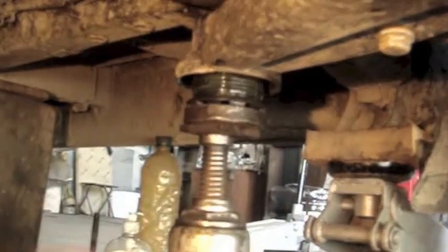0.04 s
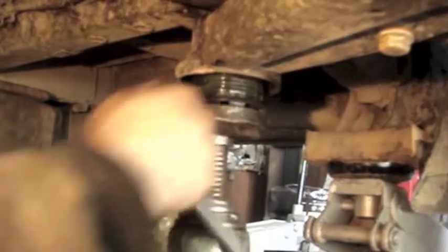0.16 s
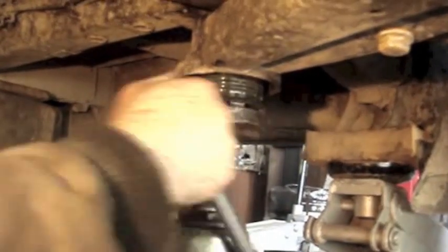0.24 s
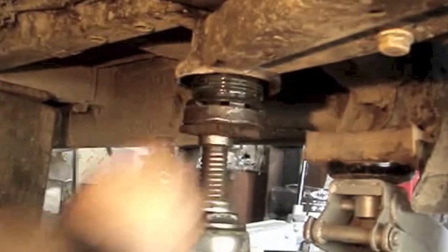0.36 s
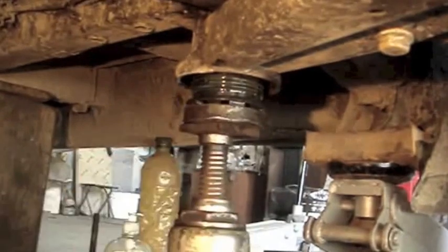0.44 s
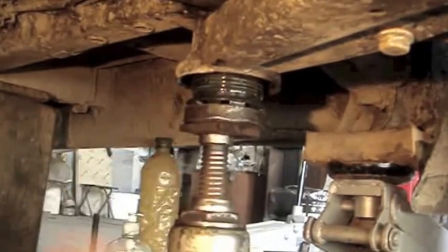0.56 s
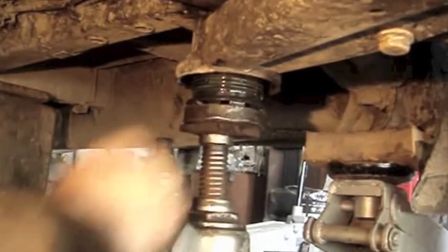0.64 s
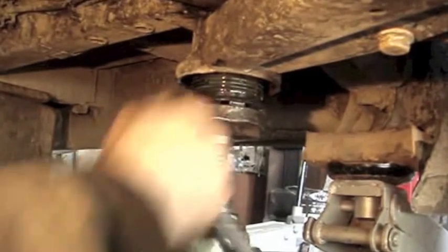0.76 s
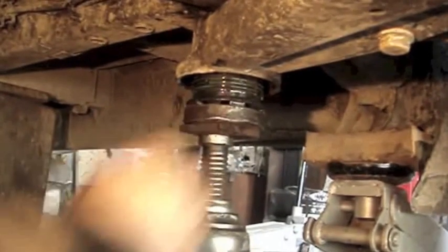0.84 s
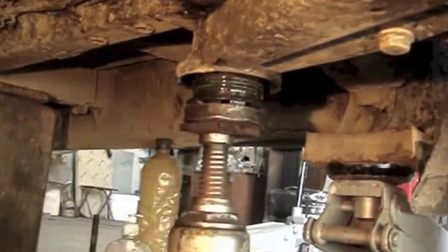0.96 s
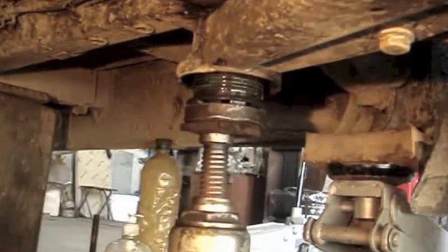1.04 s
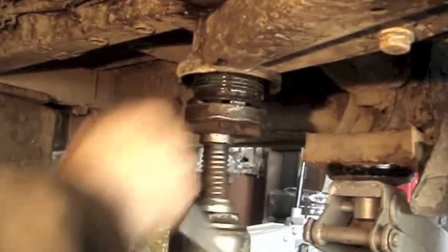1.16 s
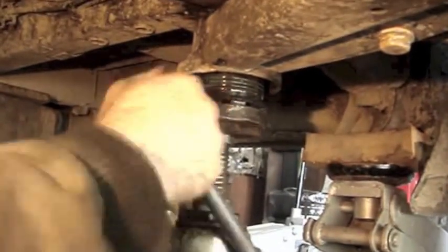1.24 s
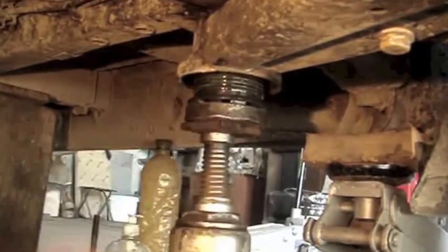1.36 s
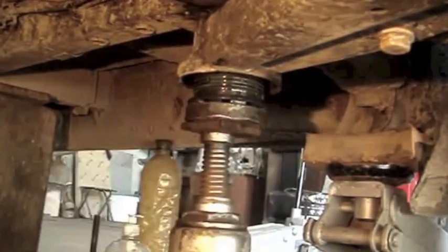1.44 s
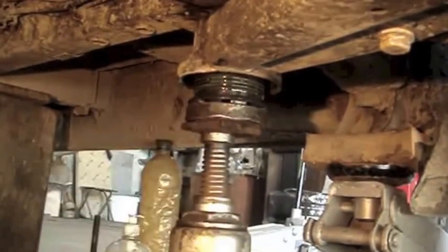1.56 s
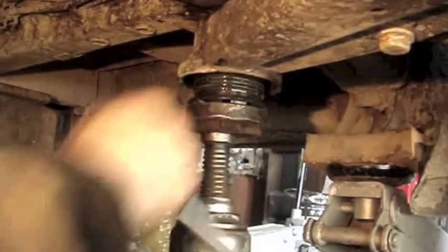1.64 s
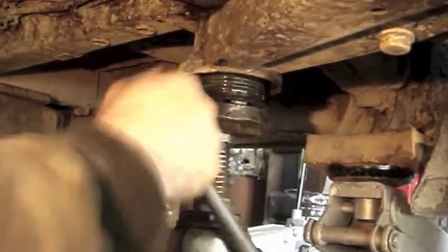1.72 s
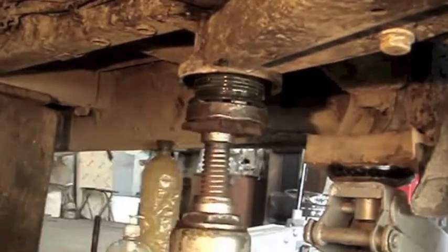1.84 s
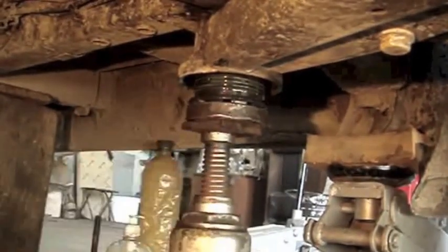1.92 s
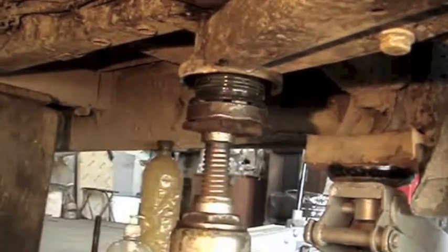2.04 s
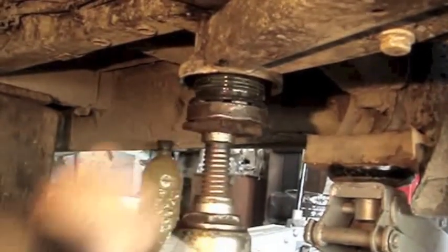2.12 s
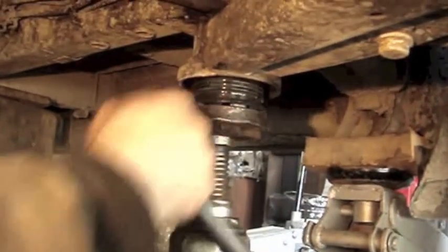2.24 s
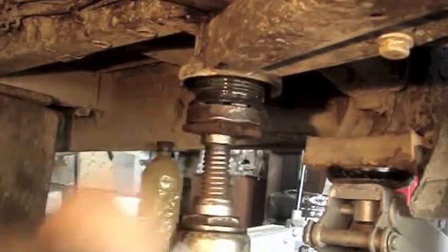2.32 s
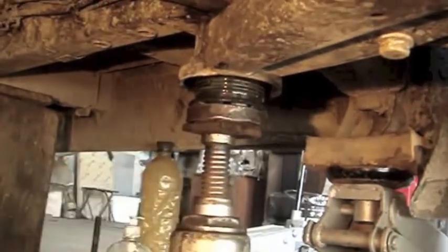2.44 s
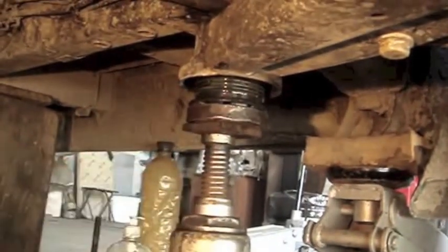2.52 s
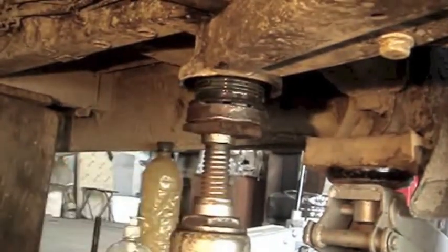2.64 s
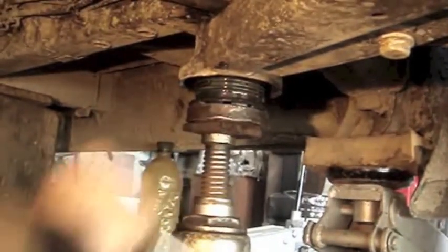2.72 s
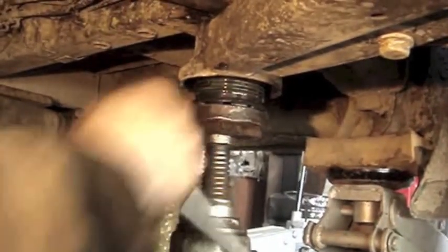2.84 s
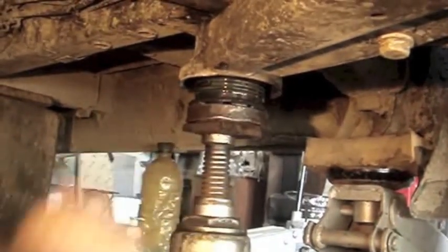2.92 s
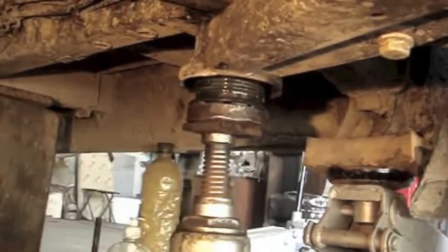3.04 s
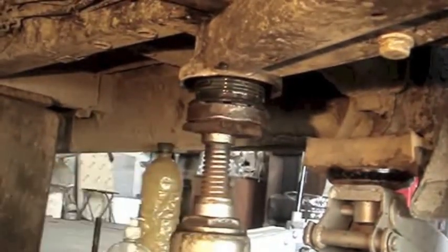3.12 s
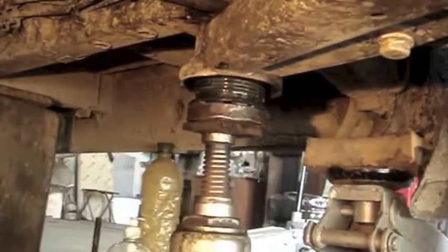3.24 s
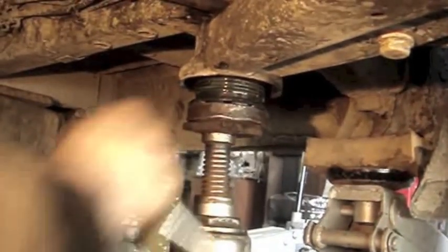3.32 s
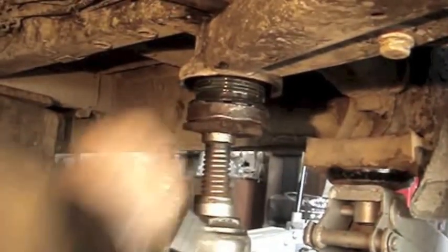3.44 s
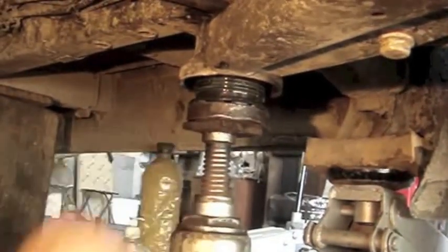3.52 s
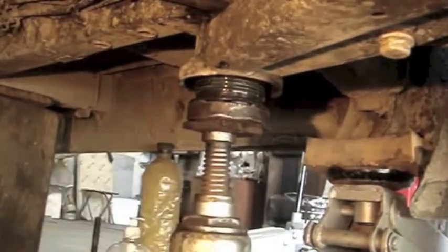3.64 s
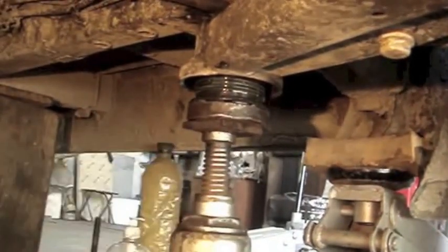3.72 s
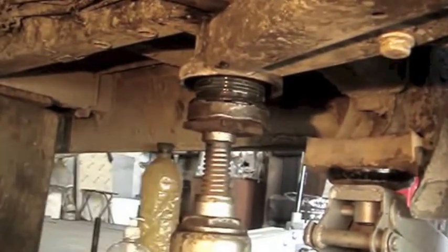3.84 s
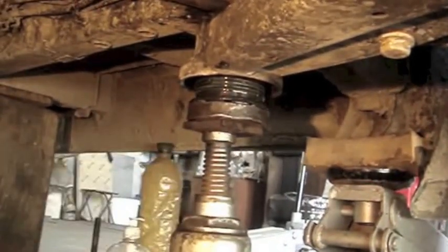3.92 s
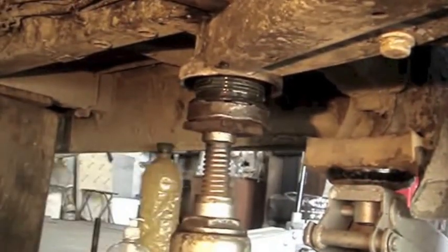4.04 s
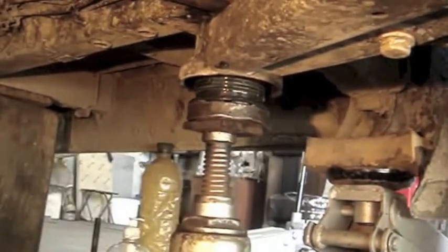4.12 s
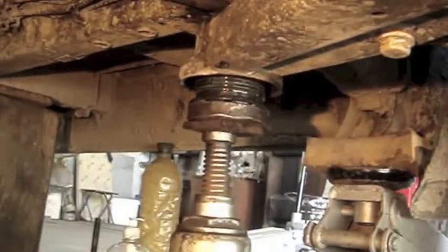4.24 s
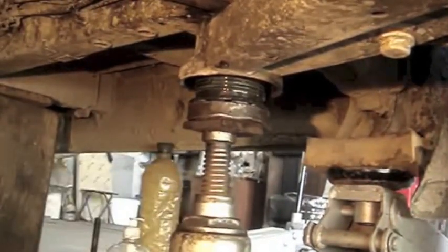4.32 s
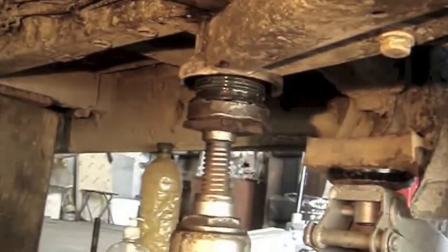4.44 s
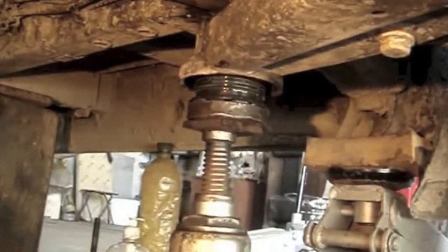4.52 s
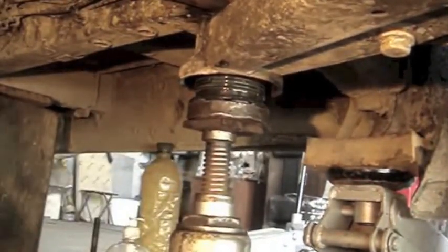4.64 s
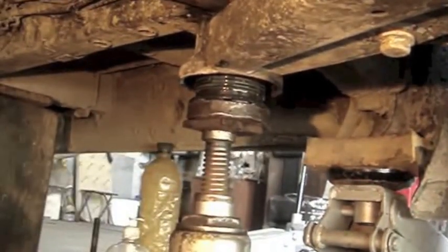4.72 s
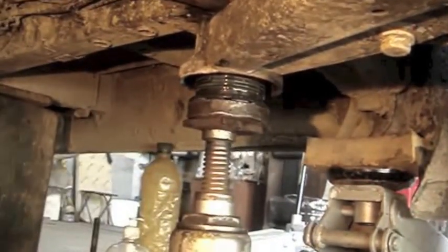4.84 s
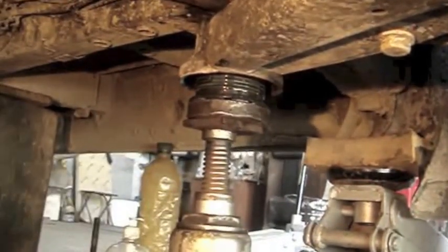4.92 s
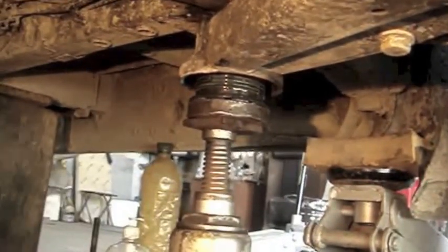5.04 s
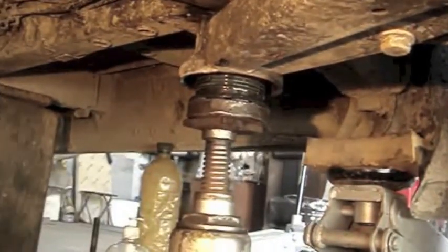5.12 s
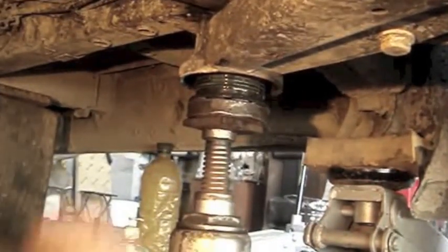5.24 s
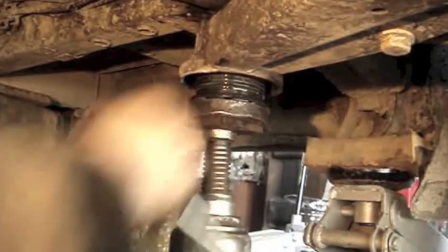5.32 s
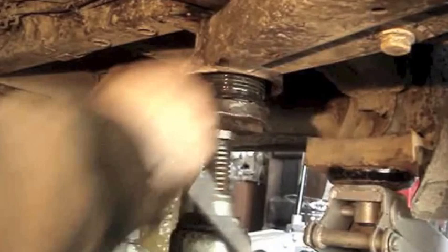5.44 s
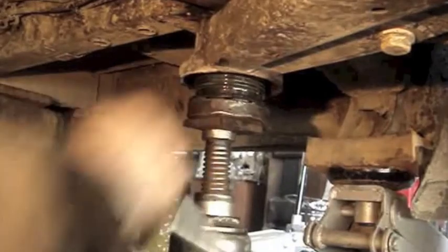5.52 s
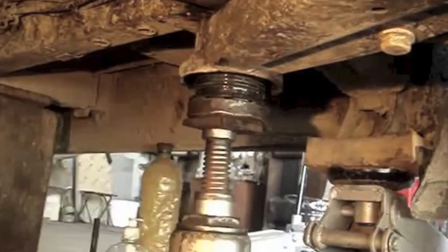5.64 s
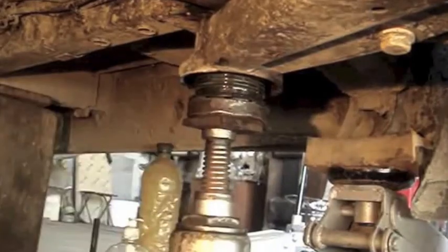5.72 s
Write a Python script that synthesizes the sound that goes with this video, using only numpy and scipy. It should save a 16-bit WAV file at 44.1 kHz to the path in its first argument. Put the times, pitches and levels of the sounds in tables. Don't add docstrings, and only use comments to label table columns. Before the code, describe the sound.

Close, bright metallic ratcheting: rattle, sharp pawl snaps, gritty socket grind and light knock, repeated quickly, then a quiet gap and a final burst.

```python
import sys
import numpy as np
from scipy import signal
from scipy.fft import rfft, irfft, next_fast_len
from scipy.io import wavfile
from scipy.ndimage import uniform_filter1d, map_coordinates

SR = 44100
rng = np.random.default_rng(int(sys.argv[2]) if len(sys.argv) > 2 else 0)


def store_pcm(level_fs):
    pcm = np.round(np.clip(level_fs, -1, 1) * 32767).astype(np.int16)
    wavfile.write(sys.argv[1], SR, np.atleast_2d(pcm).T)


def ratio(d):
    e = np.asarray(d, float) / 20
    return 10 ** e


N = 254888

# centre in Hz, width in Hz, level in dB.
PAWL_MODES = [(4338, 160, 1), (4466, 39, 6), (4692, 310, 1.5), (4933, 100, -2.5)]
# centre in Hz, width in Hz, level in dB.
HEAD_MODES = [(6107, 390, 6), (6456, 350, 7), (6850, 120, 1), (7630, 310, -10.5), (9370, 150, -5.5),
              (9300, 85, -12)]
# centre in Hz, width in Hz, level in dB.
SHANK_MODES = [(2300, 310, -9), (2550, 60, 0.5), (2890, 91, -6), (3170, 76, 2), (3700, 94, -10),
               (3880, 81, -14.5)]
# centre in Hz, width in Hz, level in dB.
SOCKET_MODES = [(329.6, 12, -12), (636, 61, -1), (798, 17, -6.5), (1116.4, 34, 2.5), (1198, 79, -5),
                (1470, 50, 3.5), (1620, 58, -2), (1908, 220, -3)]
# centre in Hz, width in Hz, level in dB.
HANDLE_MODES = [(1145, 12, -17), (4670, 9, -4), (4742, 7, 0), (6140, 14, -11)]
# centre in Hz, width in Hz, level in dB.
CRACK_MODES = [(1500, 900, 0), (7000, 3000, -4)]

# start in seconds, peak in dB, heft in dB, decay time t60 in seconds, extra pawl ring in dB.
SNAPS = [(.787, -19.5, 3, .03, -7), (.8064, -7, -5.5, 0.051, -8), (.8316, -14.5, -4, 0.034, 3),
         (.8483, -27, -3.5, 0.022, -3.5), (1.3261, -11, 2.5, .03, 0.9), (1.3521, -9, -5, 0.027, -1.5),
         (1.3654, -44, 6, 0.049, 16), (1.4072, -30, 12, 0.042, -1.5), (1.7828, -14.5, -4, .029, 8),
         (1.8082, -14, -2, .037, 0.5), (2.2714, -30, 8.5, 0.017, -3), (2.2902, -13.5, 4.5, .033, -1.5),
         (2.3175, -16, -1, 0.054, 2.5), (2.3316, -32, 3, 0.012, 8), (2.355, -46, 6, .031, 7.5),
         (2.8884, -14, 7.5, 0.018, 0.5), (2.9074, -12, 2.5, 0.026, -0.2), (2.93, -28, -15, .064, -9),
         (3.4563, -14.5, 9, 0.026, -3), (3.478, -8, -2, 0.024, -3.5), (3.505, -35, -1, .045, -25),
         (3.5234, -37, 1, 0.14, -1.5), (5.4791, -17, 10, 0.057, 7)]
# start in seconds, peak in dB, heft in dB, t60 in seconds, extra pawl ring in dB if any.
RATTLES = [(.1467, -14.5, 3, 0.04, 0), (.1885, -27, 10, 0.06, 8), (.2344, -33, 7, 0.057),
           (.6677, -17, 0, 0.034, 3), (.6724, -15, -5, 0.057), (.6975, -20.5, 6, 0.062, 4),
           (1.1682, -26, 1, 0.075), (1.1927, -18.5, 1, 0.021), (1.2004, -17.5, 1, 0.045),
           (1.6362, -17, -8, 0.028, 5), (1.6528, -13, -1, .026, -11), (1.6801, -18, 4, 0.064, -5),
           (2.1442, -21, 3.5, 0.061), (2.157, -15, -3, 0.017), (2.1732, -25, 10, .024),
           (2.1864, -17.5, 7, 0.047), (2.7524, -16, 0, 0.022, 4), (2.7664, -14, -1, .037, -7),
           (3.3337, -25, 12, .036, 6), (3.3419, -12.5, -3.5, 0.039), (3.3668, -22, 5.5, 0.034),
           (3.9534, -54, -6, 0.053), (5.3102, -12.5, 8, .043, 2), (5.3328, -11, -14, .094, -8),
           (5.3504, -21.5, 12, 0.11), (5.459, -21.5, -8, .038), (5.5154, -23, 8, .024, 3)]
# start in seconds, peak in dB, heft in dB, t60 in seconds, extra pawl ring in dB if any.
GRINDS = [(.3785, -11.5, -26, .1), (.4167, -11.5, -6, .075, -1), (.4283, -18, 6, 0.17),
          (.4448, -16.5, 4.5, 0.074), (.9179, -14, -3, 0.055, 5), (.9317, -22, 14.5, 0.1),
          (.9414, -13, -13, 0.047), (1.4221, -15, -5, 0.082, -5), (1.4406, -14, 1, 0.069),
          (1.4509, -21, 4, 0.081, -4), (1.8774, -17, -3, .065, -9), (1.8844, -15.5, -11, 0.096),
          (1.8965, -11, 0, 0.047), (1.9067, -15, 3, 0.085), (2.4014, -14, -9, 0.023),
          (2.406, -12.5, -5, 0.05), (2.4231, -16, 9, .048, -10), (2.4325, -23, 16, 0.048),
          (2.9766, -17, -2, 0.048), (2.9819, -15, -3, .1, 5), (2.9954, -20, 14, .066, 13),
          (3.5585, -16, -5, 0.089, 2), (3.5652, -20.5, 4.5, 0.074), (3.5715, -13.5, 8, 0.041, 4),
          (5.5741, -12, -8, .069, -14), (5.5891, -16, 13, .12, 7), (5.6143, -17, 16, .038, 10),
          (5.6264, -25, 14, .03, 4)]
# start in seconds, peak in dB, heft in dB, t60 in seconds, extra pawl ring in dB if any.
KNOCKS = [(.5367, -18, -5.5, 0.03), (1.038, -24.5, 4, 0.058, 4), (1.2294, -46, 2, 0.087),
          (1.5422, -27, 1.5, 0.049, 6), (2.003, -27.5, 0.5, 0.03), (2.5436, -26.5, 1, 0.041, 5),
          (2.8207, -41, 9, 0.016), (2.9514, -46, -9, 0.03), (3.0939, -46.5, 3.5, 0.074),
          (3.1221, -27.5, 2.5, 0.046), (3.394, -38, 2.5, 0.039), (3.611, -36.5, 0.5, 0.039),
          (3.7167, -31.5, 4.5, 0.04), (4.3899, -59, -2, 0.035), (4.553, -46, 8, 0.03, 3),
          (4.7248, -60, 16, .026, -15), (4.7846, -58, 6, .053), (5.7775, -22.5, 2, 0.022)]
# contacts, levels of pawl, shank and socket in dB,
# share of the heft that each of the three takes.
CONTACT_KINDS = [(SNAPS, (1.3, -14, -20), (.01, 1, 1)),
                 (RATTLES, (-2.1, 1.8, -12.5), (.01, .05, 0.98)),
                 (GRINDS, (-1.5, -1.7, -7.5), (.01, 0.16, 0.76)),
                 (KNOCKS, (1.3, 4.4, 8), (.2, 0.65, 1))]

# start in seconds, pitch in Hz, level in dB, t60 in seconds.
HEAD_RINGS = [(0.3798, 6120.0, -22.0, 0.04), (0.3799, 8930.0, -22.0, 0.04), (0.4189, 4670.0, -18.0, 0.245),
              (0.4283, 4540.0, -20.0, 0.093), (0.4336, 6130.0, -21.0, 0.04), (0.4469, 6360.0, -19.0, 0.04),
              (0.7012, 6230.0, -23.0, 0.04), (0.8064, 4430.0, -17.0, 0.041), (0.8064, 6140.0, -15.0, 0.04),
              (0.8342, 4460.0, -14.0, 0.146), (0.8338, 4760.0, -11.0, 0.183), (0.9226, 6880.0, -22.0, 0.04),
              (1.1927, 4680.0, -16.0, 0.04), (1.1927, 6660.0, -23.0, 0.04), (1.2004, 4220.0, -16.0, 0.04),
              (1.3261, 4500.0, -11.0, 0.04), (1.3262, 6120.0, -20.0, 0.057), (1.3521, 4360.0, -17.0, 0.047),
              (1.3521, 4730.0, -12.0, 0.054), (1.4237, 6640.0, -22.0, 0.04), (1.4406, 4650.0, -15.0, 0.05),
              (1.4437, 6120.0, -18.0, 0.04), (1.6362, 4720.0, -19.0, 0.04), (1.68, 6230.0, -23.0, 0.045),
              (1.7828, 4680.0, -10.0, 0.04), (1.8082, 4360.0, -17.0, 0.108), (1.8082, 4790.0, -13.0, 0.041),
              (1.9017, 6080.0, -19.0, 0.048), (2.1442, 4710.0, -22.0, 0.04), (2.2912, 4500.0, -15.0, 0.045),
              (2.2902, 6100.0, -24.0, 0.04), (2.3183, 4380.0, -15.0, 0.04), (2.3185, 4750.0, -12.0, 0.04),
              (2.4057, 4440.0, -15.0, 0.107), (2.4056, 4720.0, -12.0, 0.056),
              (2.8884, 4680.0, -13.0, 0.058), (2.9079, 4370.0, -18.0, 0.082), (2.9074, 4740.0, -10.0, 0.25),
              (2.9874, 4740.0, -16.0, 0.041), (2.9954, 4380.0, -17.0, 0.04), (3.343, 4200.0, -18.0, 0.066),
              (3.4572, 4710.0, -12.0, 0.04), (3.478, 4730.0, -10.0, 0.066), (3.5627, 4710.0, -18.0, 0.25),
              (3.5645, 6120.0, -19.0, 0.063), (5.4801, 4610.0, -13.0, 0.089),
              (5.5154, 4480.0, -24.0, 0.044), (5.5891, 4720.0, -17.0, 0.077),
              (5.5985, 6590.0, -22.0, 0.107), (5.6135, 4680.0, -12.0, 0.096)]
# start in seconds, pitch in Hz, level in dB,
# t60 in seconds.
SHANK_RINGS = [(0.1488, 2400.0, -19.0, 0.156), (0.3887, 3170.0, -32.0, 0.04), (0.4195, 3650.0, -19.0, 0.04),
               (0.4336, 1670.0, -26.0, 0.075), (0.437, 2560.0, -26.0, 0.04), (0.4448, 3180.0, -19.0, 0.159),
               (0.5379, 1110.0, -23.0, 0.077), (0.5415, 1870.0, -26.0, 0.054),
               (0.6721, 3190.0, -18.0, 0.06), (0.9188, 3130.0, -19.0, 0.05), (0.9509, 1410.0, -27.0, 0.089),
               (0.9414, 3160.0, -18.0, 0.12), (1.0388, 1120.0, -23.0, 0.065),
               (1.0386, 2400.0, -24.0, 0.062), (1.2012, 2400.0, -16.0, 0.056),
               (1.2004, 2670.0, -20.0, 0.04), (1.4221, 3130.0, -21.0, 0.073),
               (1.4475, 2570.0, -26.0, 0.091), (1.6827, 3190.0, -18.0, 0.055),
               (1.8849, 3080.0, -22.0, 0.04), (1.8842, 3740.0, -22.0, 0.086),
               (1.9028, 1410.0, -24.0, 0.162), (2.157, 1150.0, -31.0, 0.153), (2.1878, 3240.0, -18.0, 0.04),
               (2.4347, 1440.0, -22.0, 0.04), (2.5458, 1490.0, -25.0, 0.103), (2.7672, 2550.0, -21.0, 0.1),
               (2.9074, 3220.0, -29.0, 0.072), (2.9836, 3140.0, -20.0, 0.214),
               (3.007, 1490.0, -22.0, 0.166), (2.9994, 3050.0, -21.0, 0.086),
               (3.1273, 1130.0, -24.0, 0.057), (3.3446, 2450.0, -19.0, 0.073),
               (3.478, 1220.0, -34.0, 0.078), (3.5675, 3120.0, -21.0, 0.1), (3.577, 1470.0, -20.0, 0.122),
               (3.5715, 2570.0, -18.0, 0.047), (3.72, 1150.0, -26.0, 0.053), (5.3343, 2550.0, -19.0, 0.156),
               (5.3487, 650.0, -23.0, 0.218), (5.3497, 2440.0, -23.0, 0.123),
               (5.5163, 2140.0, -30.0, 0.093), (5.5754, 2300.0, -22.0, 0.04),
               (5.5741, 3150.0, -21.0, 0.188), (5.5903, 670.0, -23.0, 0.2), (5.6073, 2890.0, -19.0, 0.1),
               (5.6298, 1140.0, -25.0, 0.04), (5.6223, 1500.0, -20.0, 0.25)]

# frequency in Hz, density in dB per Hz.
AIR_SPECTRUM = [(120, -40.5), (200, -11.5), (481, -3), (1240, -10), (5230, -22), (9990, -42), (10500, -58),
                (22000, -120)]
# frequency in Hz, density in dB per Hz.
DRONE_SPECTRUM = [(12, -30.5), (26, 1.5), (49, -10.5), (87, -14.5), (179, 2.5), (260, -11), (400, -13.5),
                  (880, -120)]
# centre in Hz, width in Hz, level in dB against the hum.
MACHINE_TONES = [(151, 11, -10), (187.6, 1.9, -5.5), (309.5, 5.3, -6)]
# time in seconds, half length in seconds, centre in Hz,
# width in Hz, level in dB.
RUSTLES = [(4.22, 0.11, 1650, 110, -60), (4.22, 0.1, 3350, 300, -61), (.25, .3, 5500, 2500, -49),
           (5.43, .05, 4900, 3000, -40), (5.366, 0.039, 480, 300, -33), (5.635, 0.03, 350, 250, -33.5),
           (4.88, 0.26, 50.3, 13, -54), (4.735, .014, 500, 200, -44), (4.558, .012, 620, 120, -45),
           (4.575, .018, 250, 80, -47), (4.66, .09, 720, 30, -56), (4.84, .1, 290, 12, -54),
           (4.68, .14, 1650, 70, -55), (5.11, .015, 160, 40, -47), (5.52, .016, 470, 35, -38),
           (5.746, .012, 580, 120, -40), (5.38, .04, 310, 30, -37), (.444, .008, 600, 250, -26)]
# time in seconds, half length in seconds, level in dB.
SURGES = [
    (.22, .1, -46),
    (.6, .08, -54),
    (1.1, .1, -57),
    (1.5, .1, -57),
    (2.55, .1, -56),
]
# time in seconds, room level in dB.
ROOM_GAIN = [(0, -43), (.3, -43), (.8, -55.5), (1.6, -57.5), (3.3, -56), (3.9, -60), (4.2, -56), (4.5, -52),
             (4.7, -48.5), (4.95, -49.5), (5.25, -48.5), (5.45, -43), (5.78, -44)]
# time in seconds, size.
JERKS = [(0.15, -.01), (0.381, 0.037), (0.417, -.018), (0.442, -.042), (0.674, -0.011), (0.835, -0.044),
         (0.942, -.035), (1.351, -0.045), (1.424, -.025), (1.441, -0.02), (1.783, -0.015), (1.808, -0.021),
         (1.899, -.018), (2.32, -0.049), (2.406, -0.014), (2.764, -0.014), (2.907, -0.052),
         (2.984, -0.0087), (3.345, -0.013), (3.477, -.04), (5.332, -.047), (5.48, -0.043), (5.61, -0.043)]
# frequency in Hz, t60 in seconds.
WALLS = [(300, 0.62), (1500, 0.43), (4700, 0.27), (10000, 0.16)]
# start in seconds, length in seconds, lower edge in Hz, depth in dB.
TREBLE_GAPS = [(0.123, .018, 2300, -36), (0.204, 0.021, 7000, -21), (0.401, .012, 4300, -51),
               (.517, .016, 3600, -20), (.766, .018, 5000, -22), (1.525, .012, 3500, -25),
               (0.72, 0.013, 4000, -26), (1.022, .01, 2500, -22), (.816, .016, 4000, -57),
               (.858, .014, 5860, -12), (2.965, .008, 900, -35), (1.17, 0.018, 2560, -41),
               (1.309, 0.012, 2510, -35), (1.335, 0.014, 6130, -38.5), (1.463, 0.021, 4830, -24),
               (1.663, 0.014, 4300, -46.5), (1.796, 0.0092, 3260, -51), (1.827, .044, 5000, -35),
               (2.009, .02, 7000, -23), (2.303, .015, 4900, -25), (2.334, .019, 3700, -46),
               (2.553, 0.016, 4500, -37.5), (2.86, .024, 2800, -36.5), (3.009, 0.028, 4450, -19),
               (3.109, .011, 990, -28), (3.435, .018, 3000, -38), (3.54, 0.015, 1200, -40),
               (3.588, 0.032, 4950, -20), (3.693, 0.018, 3000, -22), (3.732, .023, 5370, -39),
               (5.314, .016, 4000, -33.5), (5.454, .024, 3800, -30), (5.554, 0.017, 1830, -35)]

# level in dB at a room level of -55 dB, share of the gain's swing.
HUM, HISS, THROB = (-60.5, .9), (-63, 0.53), (-64, .6)
BLOW_DELAY_S = .0008
FIRST_BLOW, FIRST_S = 0.93, 0.00056
CRACK_DB = 4.5
RING_DB, RING_RISE_S = -2.5, .0012
GRIP_T60_S = .075
RING_BLUR_HZ, RING_FLUTTER_DB = 70, 3


def unit(x):
    return x / np.sqrt(np.mean(x ** 2) + 1e-20)


def along(points, hz):
    f, v = np.transpose(points)
    return np.interp(np.log(hz + 1), np.log(f + 1), v)


def filtered(x, response):
    m = next_fast_len(N + SR // 2)
    return irfft(rfft(x, m) * response(np.fft.rfftfreq(m, 1 / SR)), m)[:N]


def resonant(modes, broad_db):
    low, high = modes[0][0], modes[-1][0]
    middle = np.sqrt(low * high)

    def resonance(f, centre, width):
        return 1j * f * width / (centre * centre - f * f + 1j * f * width)

    def response(f):
        total = ratio(broad_db) * resonance(f, middle, high - low)
        for k, (centre, width, db) in enumerate(modes):
            total = total + (-1) ** k * ratio(db) * resonance(f, centre, width)
        total = total * resonance(f, middle, high)
        return total / np.sqrt(np.mean(np.abs(total) ** 2))

    return response


def wobble(rate):
    knots = rng.standard_normal(int(N * rate / SR) + 4)
    return map_coordinates(knots, [np.arange(N) * rate / SR])


def narrow(hz, width_hz):
    return unit(filtered(rng.standard_normal(N), lambda f: 1 / (1 + ((f - hz) / width_hz) ** 2)))


def steady(hz, drift_hz):
    return np.sqrt(2) * np.sin(2 * np.pi * np.cumsum(hz + drift_hz * wobble(6)) / SR)


def room():
    t = np.arange(N) / SR
    room_db = np.interp(t, *np.transpose(ROOM_GAIN))
    hum_gain, hiss_gain, throb_gain = [ratio(db + share * (room_db + 55)) for db, share in (HUM, HISS, THROB)]

    def swell(at, half, db):
        return ratio(db) * np.exp(-((t - at) / half) ** 2)

    def shaped(spectrum):
        return unit(filtered(rng.standard_normal(N), lambda hz: ratio(along(spectrum, hz))))

    air = shaped(AIR_SPECTRUM) * ratio(1.5 * wobble(9.1))
    drone = shaped(DRONE_SPECTRUM) * ratio(3.0 * wobble(7.7))
    tones = sum(ratio(db + 2.5 * wobble(4)) * narrow(hz, width) for hz, width, db in MACHINE_TONES)
    whine = ratio(-9) * np.clip(2 * t - 7.7, .3, 1) * steady(7570, 3)
    hiss = narrow(5000, 4000) + whine
    rustle = sum(swell(at, half, db) * narrow(hz, width) for at, half, hz, width, db in RUSTLES)
    surges = sum(swell(*row) for row in SURGES) * steady(97, 6) * ratio(2.5 * wobble(22))
    throb = throb_gain * narrow(97, 14) + surges
    return ratio(room_db) * air + hum_gain * (drone + tones) + hiss_gain * hiss + rustle + throb


def contacts():
    for rows, colour_db, share in CONTACT_KINDS:
        for s, db, heft_db, t60, *ring_db in rows:
            parts_db = np.array(colour_db) + heft_db * np.array(share) + [sum(ring_db), 0, 0]
            yield s + BLOW_DELAY_S, db, *parts_db, t60


def wrench():
    lead_in = SR // 100
    t = np.arange(-lead_in, SR // 8) / SR
    after = np.maximum(t, 0)
    force, chirps = np.zeros((6, N + SR)), np.zeros(N + SR)
    seat = np.exp(-(after / 0.0037) ** 4)
    lead = ratio(-15) * np.exp(np.minimum(t, 0) / .0016)
    for s, db, pawl_db, shank_db, socket_db, t60 in contacts():
        lives = np.clip(t60, .008, .2) * np.array([[1.01], [.8], [1.2], [1.6]])
        decay = ratio(-60 * after / lives) + 0.15 * seat + FIRST_BLOW * np.exp(-after / FIRST_S)
        shape = np.where(t < 0, lead, decay)
        clumps = ratio(4 * rng.standard_normal((4, len(t) // 50 + 1)).repeat(50, axis=1)[:, :len(t)])
        burst = rng.standard_normal((4, len(t))) * clumps * shape
        burst *= np.sqrt(np.sum(shape ** 2, axis=1) / np.sum(burst ** 2, axis=1))[:, None]
        at = round(s * SR) - lead_in
        levels_db = db + np.array([[-7.5], [pawl_db - 4], [shank_db - 4], [socket_db - 6]])
        force[:4, at:][:, :len(t)] += ratio(levels_db) * burst

        clean = np.clip((pawl_db - max(shank_db, socket_db) - 3.5) / 8, 0, 1)
        force[4, at:][:len(t)] += clean * ratio(db + pawl_db - 15) * burst[1]
        buzz = 0
        for hz, (detune, phase) in zip((4640, 4760), rng.standard_normal((2, 2))):
            buzz = buzz + np.sin(2 * np.pi * (hz * (1 + 0.008 * detune) * t + phase))
        buzz = buzz * np.where(t < 0, lead, seat)
        chirps[at:][:len(t)] += (0.084 + clean) * ratio(db + pawl_db - 5) * buzz

        crack_db = db + max(pawl_db, shank_db, socket_db) / 2 + CRACK_DB
        force[5, round(s * SR)] += ratio(crack_db) * np.sign(burst[0, -1])
    parts = [resonant(HEAD_MODES, -3), resonant(PAWL_MODES, -8), resonant(SHANK_MODES, -4),
             resonant(SOCKET_MODES, -9), resonant(HANDLE_MODES, -40), resonant(CRACK_MODES, 6)]
    return sum(filtered(f[:N], part) for f, part in zip(force, parts)) + chirps[:N]


def rings():
    out, t = np.zeros(N + SR), np.arange(SR // 10) / SR
    for s, hz, db, t60 in list(HEAD_RINGS) + list(SHANK_RINGS):
        walk, flutter = rng.standard_normal((2, len(t)))
        phase = 2 * np.pi * hz * t + np.sqrt(2 * np.pi * RING_BLUR_HZ / SR) * np.cumsum(walk)
        flutter_db = RING_FLUTTER_DB * unit(uniform_filter1d(flutter, size=90))
        level_db = db + RING_DB - 60 * t / min(t60, GRIP_T60_S) + flutter_db
        rise = 1 - np.exp(-t / RING_RISE_S)
        out[round(s * SR):][:len(t)] += ratio(level_db) * rise * np.sin(phase)
    return out[:N]


def jerks():
    steps, t = np.zeros(N), np.arange(SR // 10) / SR
    for s, size in JERKS:
        steps[round(s * SR)] = size
    return signal.fftconvolve(steps, np.exp(-t / .008) * (1 - np.exp(-t / 0.002)))[:N]


def walls(x):
    out, step = np.zeros(N + SR), SR // 4
    for start in range(0, N, step):
        hz, t, z = signal.stft(rng.standard_normal(SR // 2), SR, nperseg=256)
        decay = ratio(-60 * t / along(WALLS, hz)[:, None])
        tail = signal.istft(z * decay, SR, nperseg=256)[1]
        wet = signal.fftconvolve(x[start:start + step], tail / np.linalg.norm(tail))
        out[start + 150:][:len(wet)] += wet
    return out[:N]


def scene():
    tool = wrench() + rings()
    return (tool + ratio(-14.5) * walls(tool) + room())[None]


def falter(x):
    hz, t, z = signal.stft(x, SR, nperseg=128, noverlap=96)
    power = np.sum(np.abs(z) ** 2, axis=0)

    def above(cut_hz):
        return np.clip((hz - cut_hz) / 700 + .5, 0, 1)

    def smooth_db(size):
        return 10 * np.log10(np.abs(uniform_filter1d(power, size=size)) + 1e-12)

    loss_db = 0
    for start, length, cut_hz, db in TREBLE_GAPS:
        inside = np.clip(np.minimum(t - start, start + length - t) / .0025 + .5, 0, 1)
        loss_db = loss_db + db * np.outer(above(cut_hz), inside)

    quick_db = smooth_db(6)
    jump_db = np.interp(t + 0.0078, t, quick_db) - np.interp(t + 0.0044, t, quick_db)
    eve_db = -22 * np.outer(above(2000), np.clip((jump_db - 15.5) / 6, 0, 1))
    loss_db = np.minimum(loss_db, eve_db)

    band, block = np.arange(len(hz)) // 2, np.arange(len(t)) // 12
    luck = rng.standard_normal((band[-1] + 1, block[-1] + 1))[band][:, block]
    strain = np.outer(np.clip(hz / 5000 - .1, 0, 1), np.clip((smooth_db(40) + 51) / 10, 0, 1))
    holes = (luck < -.9) * (np.abs(hz - 4700) > 500)[:, None]
    patchy_db = strain * (4.5 * np.minimum(luck, .5) + .8 - 12 * holes)
    return signal.istft(z * ratio(loss_db + patchy_db), SR, nperseg=128, noverlap=96)[1][:N]


def top_cut(x):
    return signal.sosfilt(signal.butter(12, 10770, fs=SR, output="sos"), x)


def record(dry):
    limited = dry[0] / (1 + np.abs(dry[0] / 0.55) ** 3) ** (1 / 3)
    x = limited + jerks()
    x = filtered(x, lambda hz: ratio(-55 * np.clip((hz - 10225) / 500 + .5, 0, 1)))
    return top_cut(falter(x)[None])


dry = scene()
out = record(dry)
store_pcm(out)
```